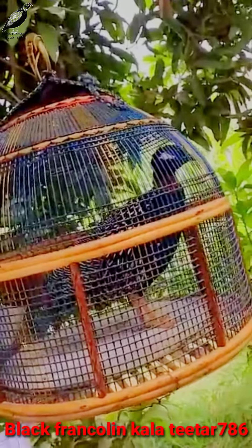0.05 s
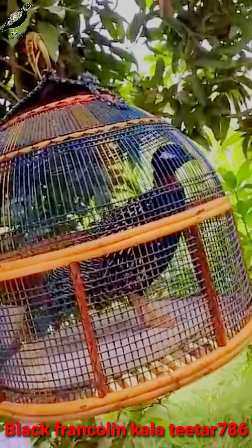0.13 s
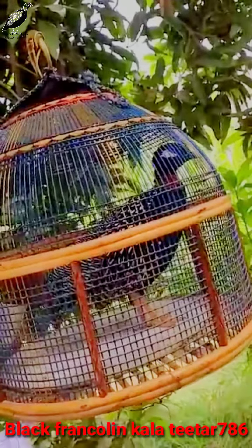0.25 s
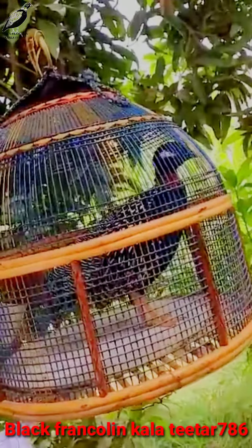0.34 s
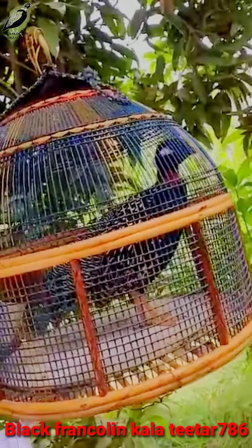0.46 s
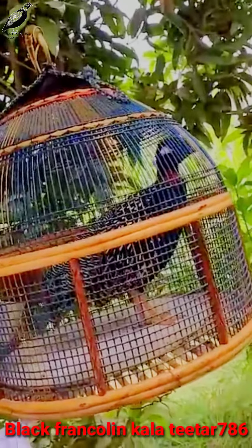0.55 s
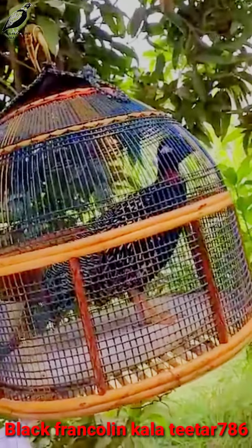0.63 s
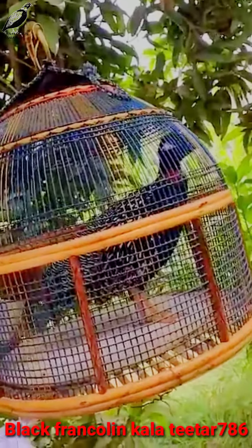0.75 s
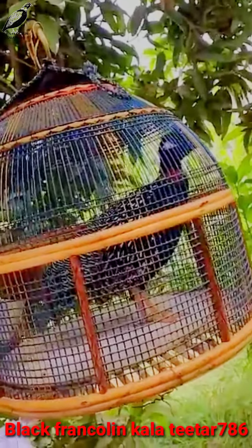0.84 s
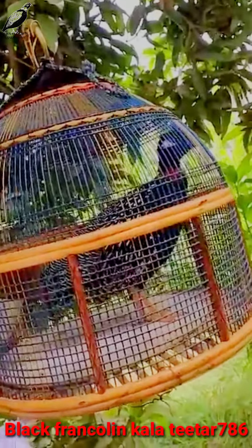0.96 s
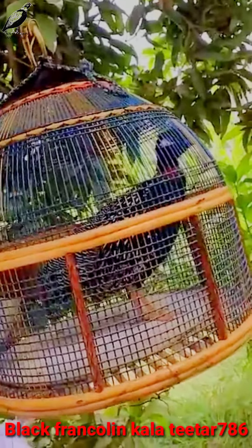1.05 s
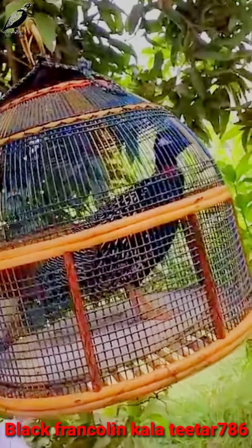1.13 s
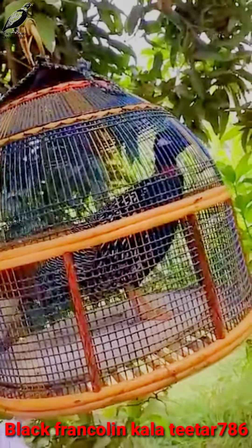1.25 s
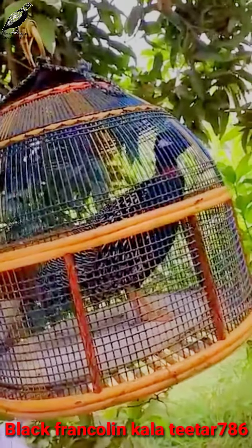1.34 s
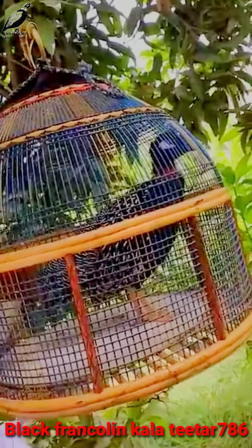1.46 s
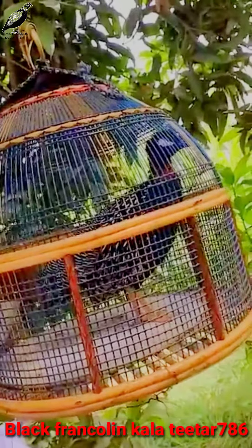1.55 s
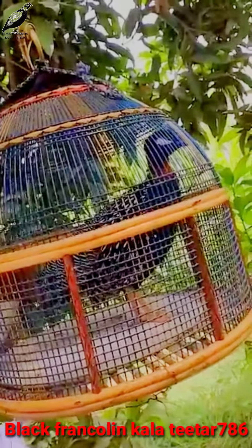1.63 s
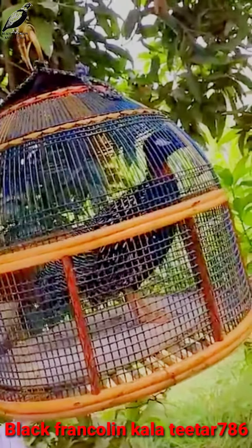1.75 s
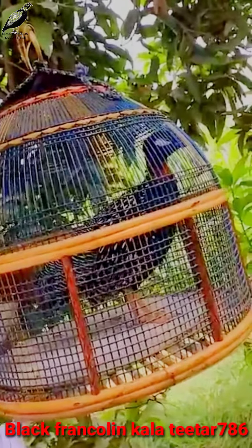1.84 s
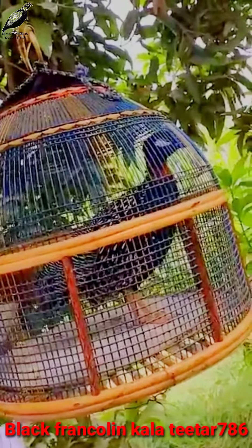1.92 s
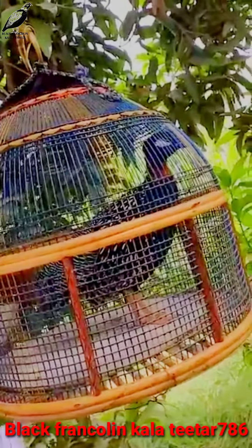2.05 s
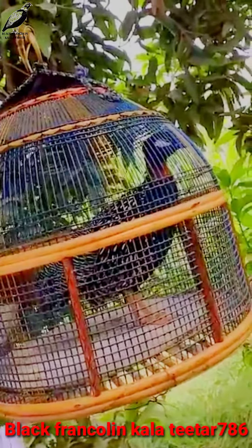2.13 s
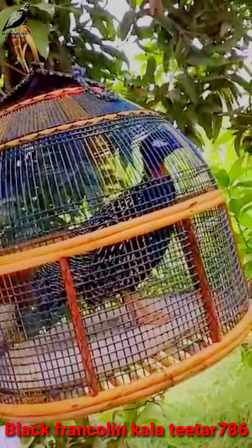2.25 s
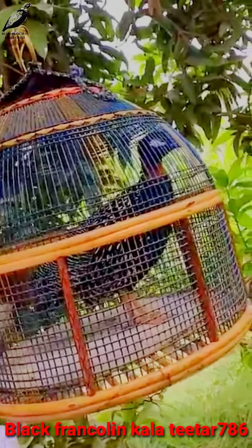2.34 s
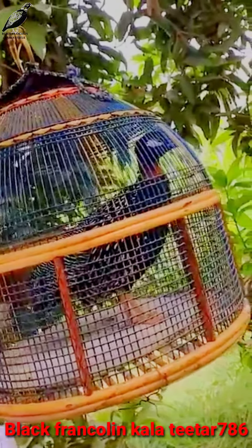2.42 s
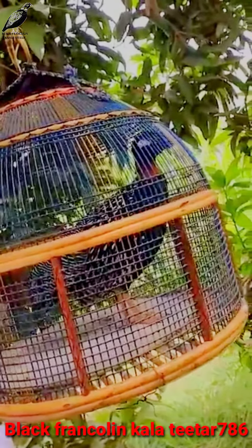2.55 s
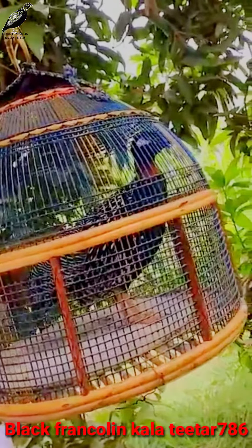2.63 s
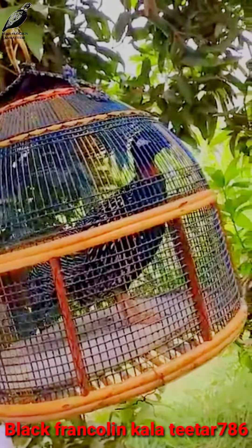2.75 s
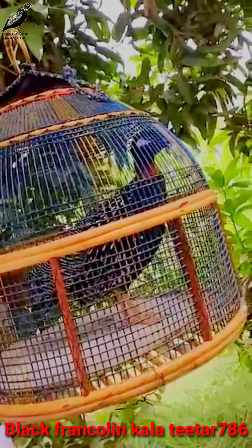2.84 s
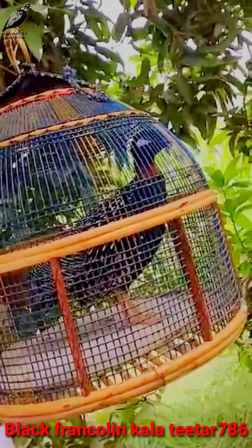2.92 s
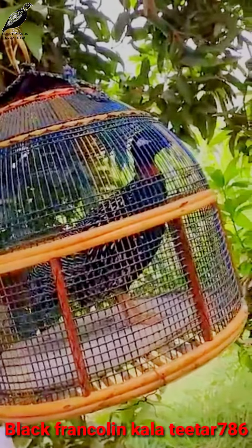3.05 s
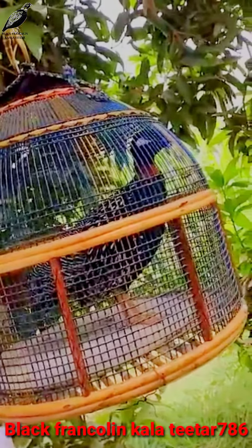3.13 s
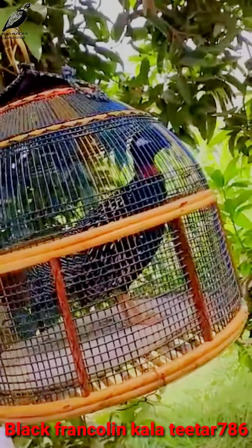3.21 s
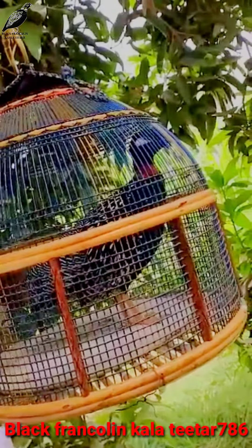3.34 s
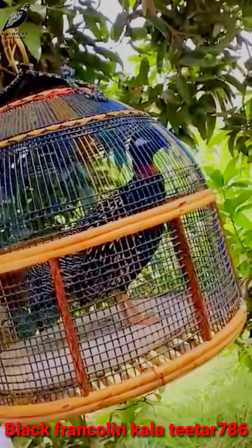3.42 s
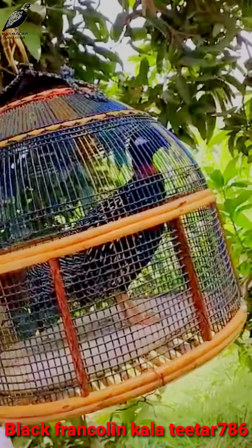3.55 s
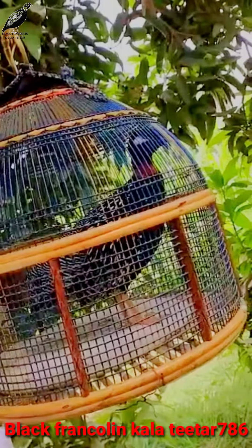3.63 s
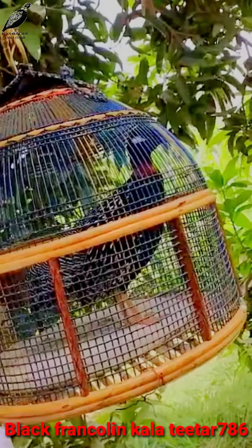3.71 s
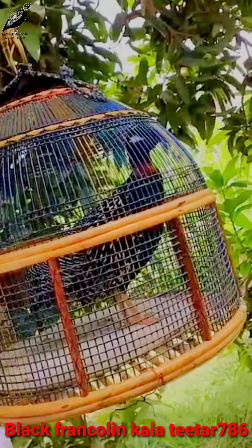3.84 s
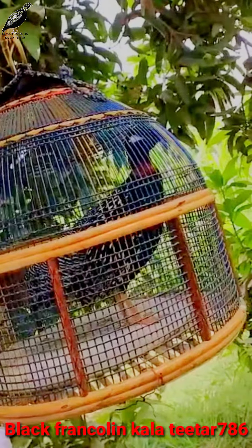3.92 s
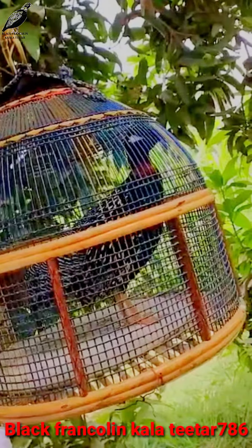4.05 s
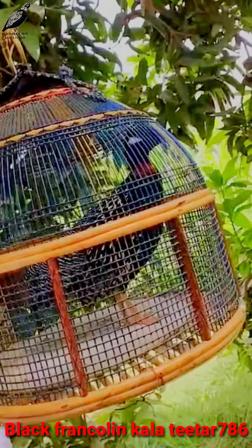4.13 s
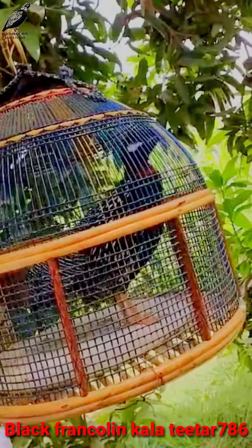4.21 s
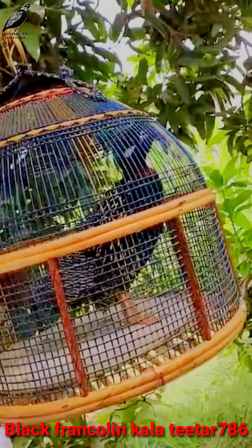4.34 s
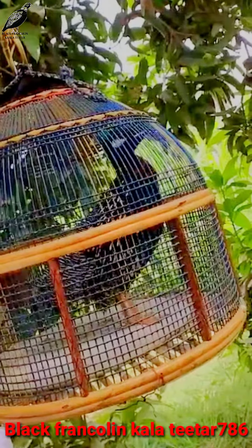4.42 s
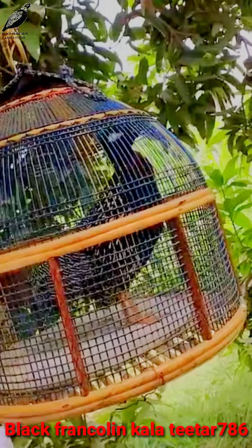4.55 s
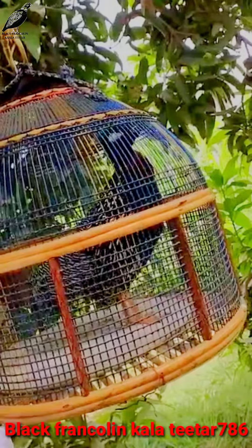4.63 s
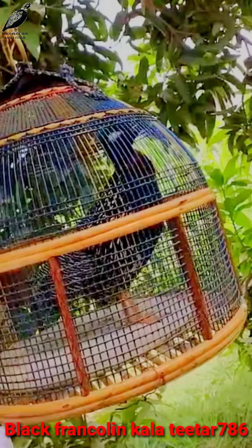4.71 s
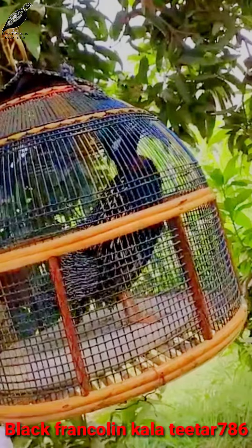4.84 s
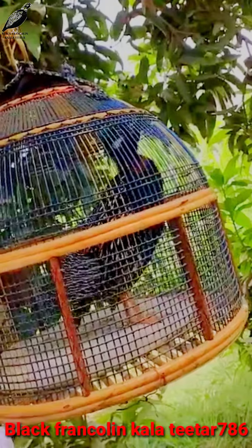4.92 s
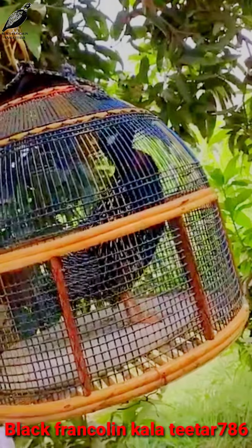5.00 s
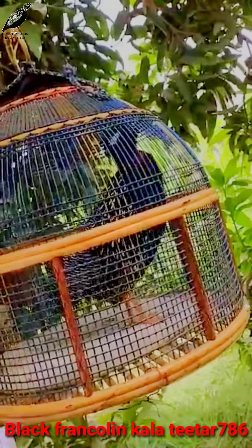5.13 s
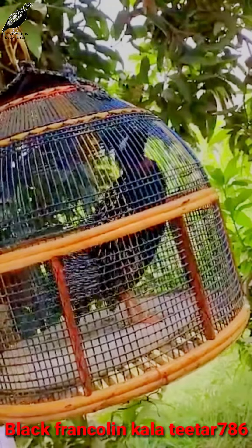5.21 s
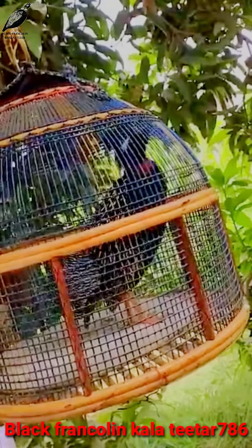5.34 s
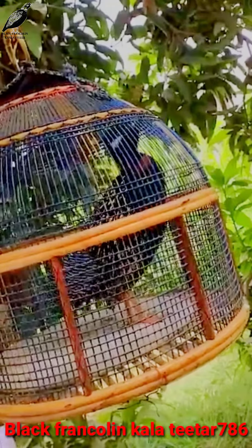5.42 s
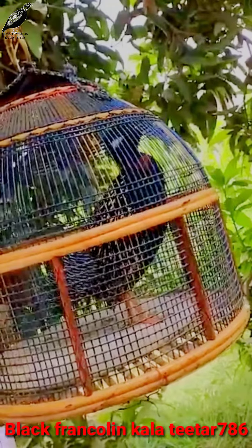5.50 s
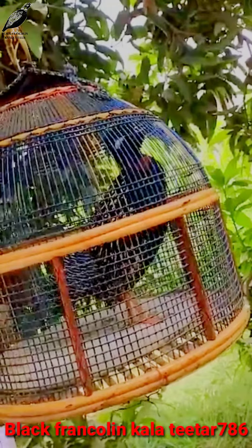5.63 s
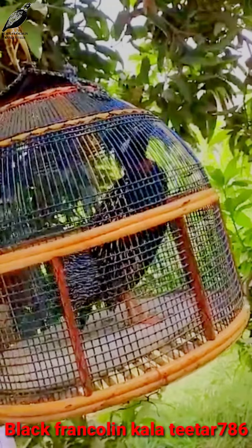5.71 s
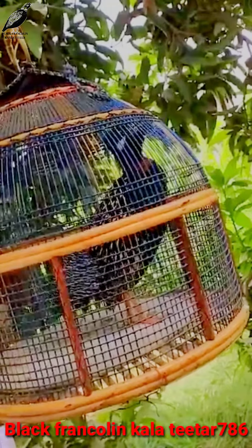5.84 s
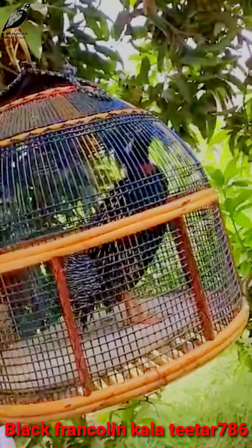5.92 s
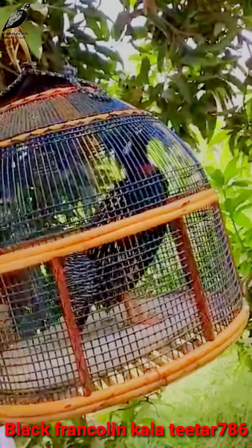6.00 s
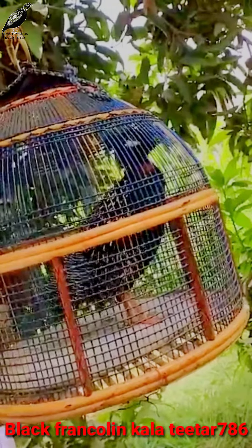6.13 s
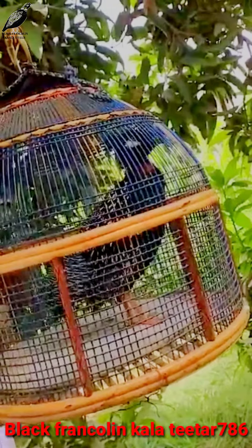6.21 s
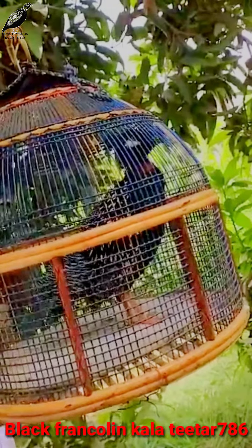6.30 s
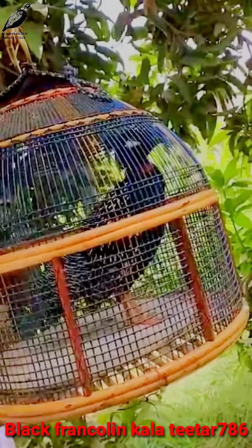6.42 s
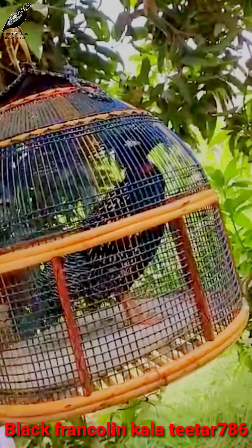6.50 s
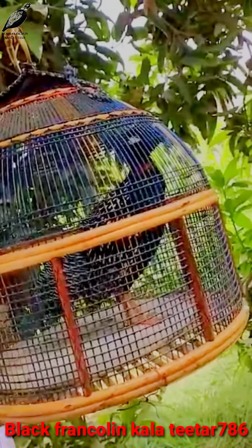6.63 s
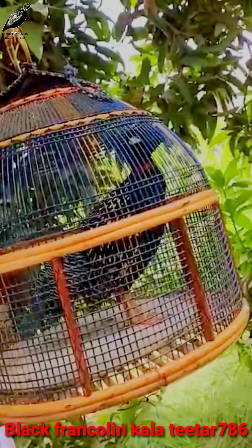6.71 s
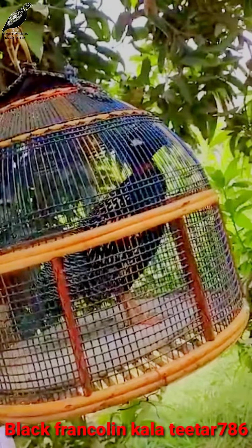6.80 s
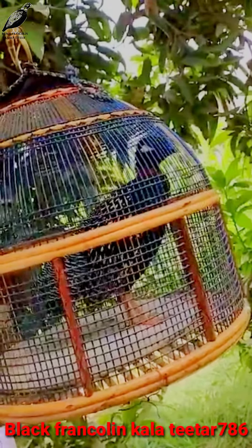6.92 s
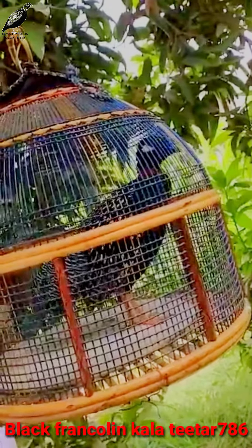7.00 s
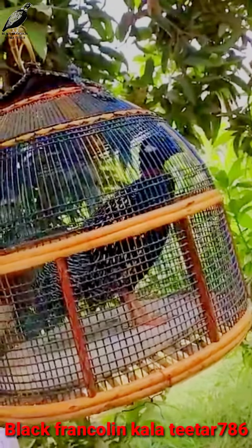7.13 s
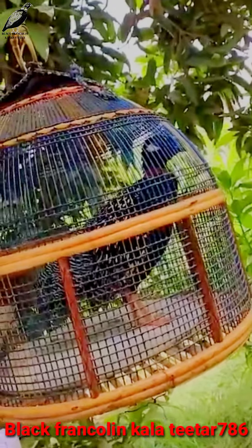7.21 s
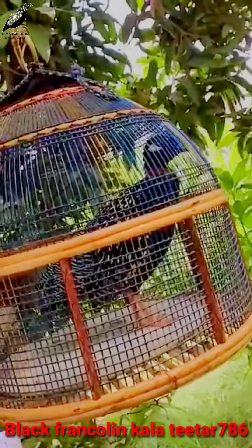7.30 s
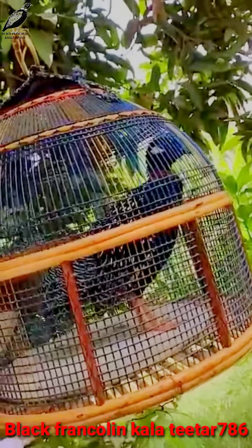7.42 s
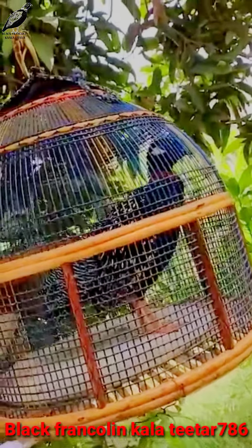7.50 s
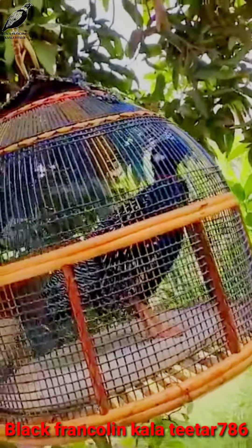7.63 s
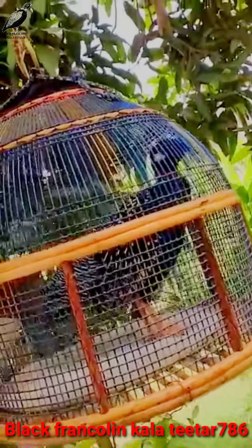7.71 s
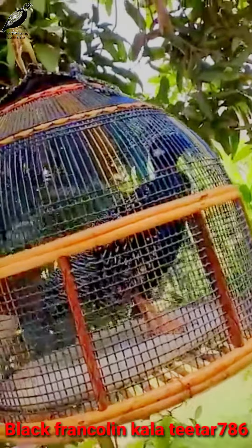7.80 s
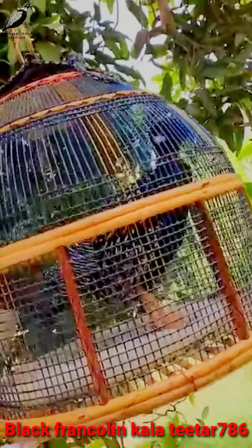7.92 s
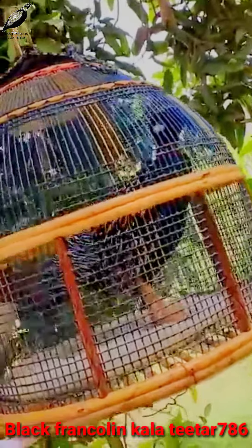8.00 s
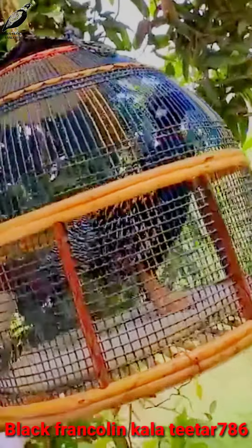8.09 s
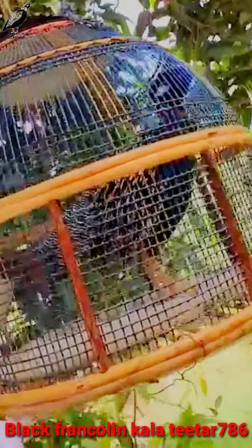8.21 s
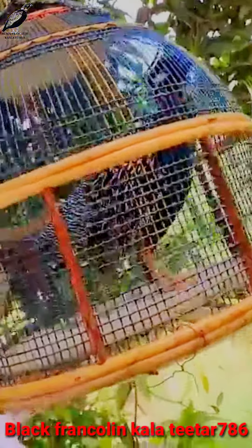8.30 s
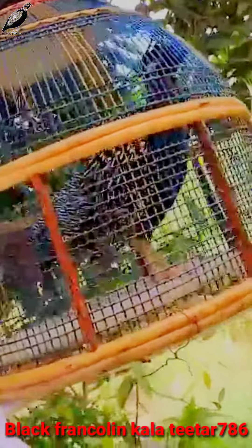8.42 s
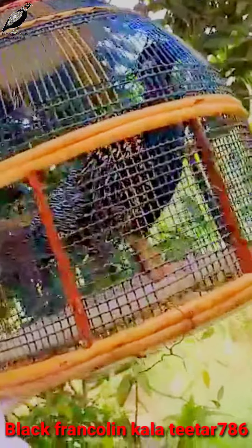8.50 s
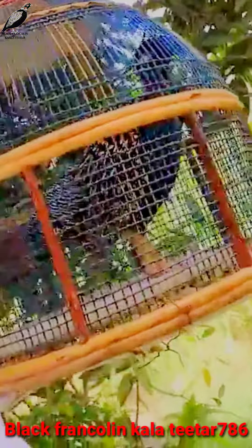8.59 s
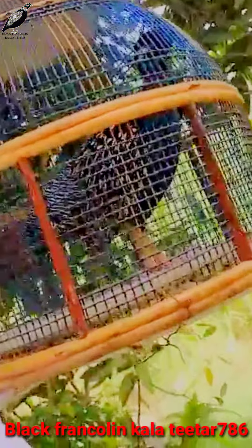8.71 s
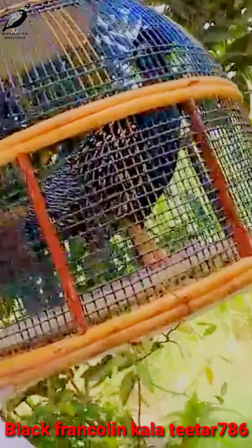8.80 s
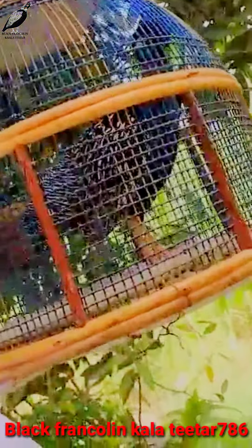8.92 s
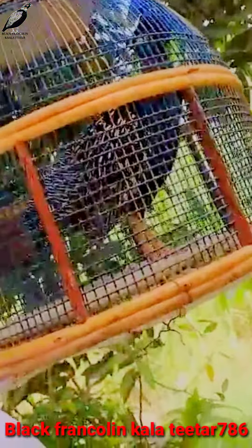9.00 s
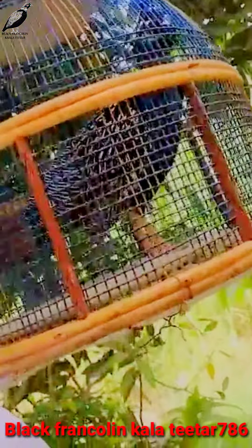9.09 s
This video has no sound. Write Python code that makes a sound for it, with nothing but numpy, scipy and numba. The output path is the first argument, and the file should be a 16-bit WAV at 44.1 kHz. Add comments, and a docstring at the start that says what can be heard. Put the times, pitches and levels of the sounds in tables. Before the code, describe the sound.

From 0 to 4.3 s it is quiet outdoors: soft leaf hiss, fluttering low traffic rumble, a distant engine hum, faint hoarse chirps and thin bird notes, slightly clearer around 2.2 s with a mellow falling whistle, and a high insect buzz at 2.7 s. At 4.35 s a close caged bird gives a tiny hard double cluck with a squeaky whistle break. Then comes its very loud, dry, grating call: a rasp at 4.86-5.01, a pair at 5.22-5.43, and three more from 5.72 to 6.07, centred near 2.8 kHz, sagging slightly, with rough pulsing, brief whistled breaks and low air blasts. Bright short echoes die quickly. From 6.3 s faint hoarse chirps return, and from 6.5 s a songbird repeats rising, flicked notes, growing more distant, alongside thin twitters. A soft dull cage tick lands at 7.67, another insect buzz at 8.8, and birds continue to about 9.1 s.

```python
"""Caged bird's raspy call

A partridge-like bird in a wire cage rasps one loud call a metre from a phone hung among trees.
Its voice organ (syrinx) throbs in uneven pulses that ring the throat, and at times it whistles purely.
Leaves and walls echo the call as dying noise. Behind it are gliding songbirds, hoarse chirps and
a buzzing insect, one dull tick of the cage, and noise-made leaves and traffic with an engine's hum."""
import sys
import numpy as np
from scipy import signal
from scipy.fft import rfft, irfft
from scipy.io import wavfile
from scipy.ndimage import uniform_filter1d, minimum_filter1d
from numba import njit

SR = 44100
rng = np.random.default_rng(int(sys.argv[2]) if len(sys.argv) > 2 else 0)


def inscribe(sig):
    """Save sig as 16-bit PCM at rate SR to the path in sys.argv[1].

    A 1-D sig is mono; a 2-D sig holds one channel per row.
    Samples are clipped to [-1, 1] before scaling.
    """
    pcm = np.round(np.clip(np.atleast_2d(sig).T, -1, 1) * 32767)
    wavfile.write(sys.argv[1], SR, pcm.astype(np.int16))


N = 403515
TIME = np.arange(N) / SR  # seconds

# Rasped syllables: start_s, end_s, attack_s, level_db, throat_hz (halfway through),
# blast_db (low air blast against level_db), upper_db (upper throat against the main throat tone)
SYLLABLES = [(4.858, 5.011, 0.0064, -6, 2794, 3, -8), (5.217, 5.364, 0.019, -5.5, 2775, 0.5, -9.5),
             (5.381, 5.432, 0.004, -6, 2765, -1.5, -7.5), (5.723, 5.83, 0.019, -5, 2830, -0.5, -7.5),
             (5.902, 5.969, 0.0098, -6.5, 2690, -1, -9), (5.985, 6.074, 0.0036, -6, 2775, -2, -9)]
ATTACK_FROM_DB, RELEASE_S, RELEASE_DB = -10.5, .008, -5.5
THROAT_SAG_HZ_PER_S = 320
WOBBLES_PER_S, LEVEL_WOBBLE_DB, THROAT_WOBBLE_HZ, UPPER_WOBBLE_DB = 70, 1, 90, 3.5
# The low blast swells and sinks: where its top is (share of the length), then dB at start and end
BLAST_TOP_AT, BLAST_START_DB, BLAST_END_DB = 0.47, -8.5, -7
RASP_ROUGH = 0.55  # share of noise puffs; the rest is pulses


def rasp():
    """Each syllable attacks, holds and releases while its throat tone sags and wavers."""
    out = np.zeros((2, N))  # voice and low blast
    for t0, t1, attack_s, db, throat_hz, blast_db, upper_db in SYLLABLES:
        part, t, gate = span(t0, t1, 0.0015)
        shape_db = np.interp(t, [t0, t0 + attack_s, t1 - RELEASE_S, t1], [ATTACK_FROM_DB, 0, 0, RELEASE_DB])
        swell_db = np.interp((t - t0) / (t1 - t0), [0, BLAST_TOP_AT, 1], [BLAST_START_DB, 0, BLAST_END_DB])
        sagging_hz = throat_hz - THROAT_SAG_HZ_PER_S * (t - (t0 + t1) / 2)
        level_wobble, throat_wobble, upper_wobble = (
            np.interp((t - t0) * WOBBLES_PER_S, np.arange(40), knots)
            for knots in rng.standard_normal((3, 40)))
        level_db = db + shape_db + LEVEL_WOBBLE_DB * level_wobble
        wavering_hz = sagging_hz + THROAT_WOBBLE_HZ * throat_wobble
        wavering_upper_db = upper_db + UPPER_WOBBLE_DB * upper_wobble
        out[:, part] += gate * throat(t, level_db, wavering_hz, blast_db + swell_db,
                                      wavering_upper_db, RASP_ROUGH)
    return out


# Rough air under the clucks and whistles: start_s, end_s, level_db, throat_hz,
# blast_db (against level_db), upper_db (against the main throat tone)
BREATHS = [(4.343, 4.39, -27, 3250, -15, 1), (4.394, 4.437, -32, 2753, 12.5, 11.5),
           (5.355, 5.383, -27.5, 2900, 13.5, -2), (5.964, 5.992, -27.5, 2980, 12.5, -11.5)]
BREATH_ROUGH = 0.99  # nearly all noise puffs


def breath():
    """Turbulent air rings the same throat, with almost no clean pulses."""
    out = np.zeros((2, N))
    for t0, t1, db, throat_hz, blast_db, upper_db in BREATHS:
        part, t, gate = span(t0, t1, 0.0015)
        out[:, part] += gate * throat(t, db, throat_hz, blast_db, upper_db, BREATH_ROUGH)
    return out


# Upper throat resonances: centre_hz, width_hz (of the first pass), level_db (relative)
UPPER_RESONANCES = [(4590, 730, 4.5), (5173, 950, -3), (7380, 730, -8.5), (7970, 170, -17)]
# Resonances of the low air blast: centre_hz, width_hz, level_db (relative)
BLAST_RESONANCES = [(126, 42, -8.5), (240, 190, 3.5), (670, 1300, 6), (1650, 480, -4.5)]
PULSES_PER_S = 265  # on average
# Ring widths are those of the first pass
THROAT_WIDTH_HZ = 800
CORE_HZ, CORE_WIDTH_HZ, CORE_DB = 3050, 260, -6  # narrow resonance inside the throat band
TOP_HISS_HZ, TOP_HISS_WIDTH_HZ, TOP_HISS_DB = 9900, 3600, -31.5
BEAK_TOP_HZ = 8600


def throat(t, db, throat_hz, blast_db, upper_db, rough):
    """Uneven syrinx pulses and puffs of noise ring the throat: the voice, and its low blast of air."""
    period_chance, size_chance = rng.standard_normal((2, 200))
    throat_noise, upper_noise, blast_noise = rng.standard_normal((3, len(t)))
    cycles = .75 + PULSES_PER_S * (t - t[0])  # the first pulse falls as the beak opens
    wobble = np.interp(cycles, np.arange(200), period_chance)
    cycles = cycles + .08 * np.minimum(cycles - .75, 1) * wobble  # uneven periods
    whole = np.floor(np.maximum(cycles, 0))
    size = undb(1.3 * size_chance)[np.clip(whole, 0, 199).astype(int)]
    pulses = level(size * (np.diff(whole, prepend=0) > 0), 0)
    puff = level(size * np.exp(-(cycles - whole)), 0)  # dies away within each cycle

    drive = (1 - rough) * pulses + rough * puff * throat_noise
    broad = level(ring(drive, throat_hz, THROAT_WIDTH_HZ), 0)
    core = level(ring(drive, CORE_HZ, CORE_WIDTH_HZ), CORE_DB)
    main = steep(level(broad + core, 0), BEAK_TOP_HZ, "low")

    upper_drive = 0.18 * pulses + puff * upper_noise
    upper = sum(undb(d) * level(ring(upper_drive, hz, width), 0) for hz, width, d in UPPER_RESONANCES)
    top_hiss = level(ring(puff * throat_noise, TOP_HISS_HZ, TOP_HISS_WIDTH_HZ), TOP_HISS_DB)
    upper = steep(level(upper, 0), BEAK_TOP_HZ, "low") + top_hiss

    blast_drive = 0.043 * pulses + puff * blast_noise
    low = sum(undb(d) * level(svf(blast_drive, hz + 0 * t, 1. * width), 0)
              for hz, width, d in BLAST_RESONANCES)
    voice = undb(db) * (main + undb(upper_db) * upper)
    blast = undb(db + blast_db) * steep(level(low, 0), 5000, "low")
    return np.array([voice, blast])


# Clucks that open and close the first note: start_s, length_s, start_hz, start_db
CLUCK_NOTES = [(4.3457, 0.0052, 2603, -0.5), (4.3509, 0.0034, 2800, 2), (4.3563, .004, 2500, -4),
               (4.362, .003, 3200, -4), (4.4288, 0.0038, 2750, -1)]
CLUCK_FADE_DB, CLUCK_RISE = 5.5, 1.08  # level lost and pitch ratio by the end of a cluck


def clucks():
    """Short hard bursts of one rough throat tone, each rising in pitch and fading."""
    notes = [[(s, hz, db), (s + length, CLUCK_RISE * hz, db - CLUCK_FADE_DB)]
             for s, length, hz, db in CLUCK_NOTES]
    return tones(notes, 0.00059, rough=0.36, spread_hz=880)


# Voiced end of the first cluck: time_s, pitch_hz, level_db
HONK_PATH = [(4.354, 847, -18.5), (4.362, 827, -14.5), (4.369, 875, -10.5), (4.377, 980, -24)]
# Its overtones: multiple (of the pitch), level_db (against HONK_PATH)
HONK_OVERTONES = [(2, -3), (3, -1.5), (4, -4.5), (5, -13.5), (6, -4), (7, -21.5), (8, -20), (9, -19.5)]


def honk():
    """A brief voiced sound: overtones of one moving pitch, without the pitch itself."""
    return tones([HONK_PATH], 0.0017, HONK_OVERTONES, rough=.35, spread_hz=220)


# Breaks into a whistle: start_s, end_s, start_hz, end_hz, level_db
WHISTLE_NOTES = [(4.396, 4.41, 4970, 5140, -14.5), (4.409, 4.436, 6045, 6223, -17),
                 (4.414, 4.428, 5610, 5433, -18.5), (5.362, 5.381, 5610, 5470, -11),
                 (5.965, 5.984, 5620, 5810, -11)]


def whistles():
    """The call breaks into gliding sine tones, slightly shaken."""
    return tones(glide(WHISTLE_NOTES), 0.00088, rough=0.4, spread_hz=630)


ECHO_LOW_HZ = 1760  # the echoes thin out below this
ECHO_TREBLE_HZ, ECHO_TREBLE_DB = 10560, 18
NEAR_ECHO_DB, NEAR_ECHO_T60_S, NEAR_ECHO_S = -11.5, 0.36, .095  # gone by NEAR_ECHO_S
FAR_ECHO_DB, FAR_ECHO_T60_S = -21, 0.38


def call_echo(call):
    """Leaves and walls scatter the call, near and far, with little bass and much treble."""
    thin = signal.sosfilt(signal.butter(3, ECHO_LOW_HZ, "high", fs=SR, output="sos"), call)
    # the echoes sound brighter than the call
    thin = thin + undb(ECHO_TREBLE_DB) * ring(call, ECHO_TREBLE_HZ, 7000)
    near = echo(thin, NEAR_ECHO_DB, NEAR_ECHO_T60_S, NEAR_ECHO_S)
    return near + echo(thin, FAR_ECHO_DB, FAR_ECHO_T60_S)


BLAST_LOW_HZ = 97
BLAST_TAIL_DB, BLAST_TAIL_T60_S = -23, 0.17


def near_blast(blast):
    """The low blast reaches the near microphone, with a weak tail of its own."""
    near = steep(blast, BLAST_LOW_HZ, "high")
    return near + echo(near, BLAST_TAIL_DB, BLAST_TAIL_T60_S)


TICK_S = 7.6685
# Ringing of the cage: pitch_hz, level_db (peak, before filtering), t60_s (time to fall 60 dB)
CAGE_MODES = [(151.4, -40, 0.049), (810, -46, 0.013), (1310, -42.5, 0.0094), (1837, -38, 0.0071)]


def tick():
    """One light, dull knock of the cage: fading sine tones, trimmed at both ends of the pitch range."""
    t = np.maximum(TIME - TICK_S, 0)
    rings = -sum(undb(db - 60 * t / t60) * np.sin(2 * np.pi * hz * t) for hz, db, t60 in CAGE_MODES)
    return steep(steep(rings, 2150, "low"), 69.7, "high")


TREE_ECHO_DB, TREE_ECHO_T60_S = -2, 0.16


def songbirds():
    """Small birds and an insect near and far, smeared by an echo from the trees."""
    dry = sweeps() + twitter() + mellow() + chirps() + insect()
    return dry + echo(dry, TREE_ECHO_DB, TREE_ECHO_T60_S)


# One songbird, moving further off: start_s, knee_s, start_hz, knee_hz, knee_db, top_db
SWEEP_NOTES = [(6.501, 6.554, 5740, 5670, -59.5, -62.5), (6.669, 6.734, 4720, 5150, -63, -64),
               (6.866, 6.921, 4570, 5330, -61.5, -62), (7.05, 7.134, 4330, 5200, -60.5, -61.5),
               (7.645, 7.697, 4704, 5050, -70.5, -71), (7.822, 7.863, 4800, 5000, -69, -70.5),
               (7.994, 8.05, 4705, 4920, -72, -80), (8.165, 8.215, 4680, 4940, -74, -82),
               (8.352, 8.395, 4700, 4960, -69, -73), (8.54, 8.587, 4750, 4880, -71.5, -73),
               (8.725, 8.815, 4000, 4980, -74, -79), (8.945, 9.047, 4020, 5090, -74, -78)]
# Flick after the knee: after_knee_s, pitch_hz, level_db (against top_db),
# distance_loss (dB lost per dB that the knee lies below NEAR_SONG_DB)
FLICK_PATH = [(.004, 5500, 1, 0), (.014, 6222, -2.5, .8), (.032, 6680, -1, -1), (.052, 6720, -12, 5)]
SWEEP_START_DB, NEAR_SONG_DB = -5.5, -62  # the start is against knee_db


def sweeps():
    """Each note slides to a knee, then flicks up to a held top; distance reshapes the flick."""
    notes = []
    for t0, knee, start_hz, knee_hz, db, top_db in SWEEP_NOTES:
        faintness_db = max(NEAR_SONG_DB - db, 0)
        slide = [(t0, start_hz, db + SWEEP_START_DB), (knee, knee_hz, db)]
        flick = [(knee + s, hz, top_db + d - loss * faintness_db) for s, hz, d, loss in FLICK_PATH]
        notes.append(slide + flick)
    return tones(notes, 0.0061, rough=0.57, spread_hz=200)


# Other thin notes: start_s, end_s, start_hz, end_hz, level_db
TWITTER_NOTES = [(.1, .3, 646, 740, -77), (.17, .26, 4600, 5300, -82), (.55, .75, 1730, 1800, -76),
                 (.83, .92, 4070, 5160, -78), (1.03, 1.09, 5060, 6200, -76), (1.29, 1.36, 4230, 4900, -78),
                 (1.5, 1.57, 4100, 4800, -80), (2.186, 2.204, 2420, 2550, -57.5),
                 (7.248, 7.278, 5330, 7880, -67), (7.31, 7.38, 3520, 5630, -68.5),
                 (7.45, 7.47, 6670, 7530, -66), (7.51, 7.585, 3470, 5370, -70.5),
                 (7.66, 7.695, 7020, 7650, -70), (7.72, 7.78, 3460, 4870, -72),
                 (7.997, 8.06, 3840, 3900, -73), (8.09, 8.135, 6440, 6350, -75),
                 (8.24, 8.27, 3750, 3830, -77), (8.445, 8.51, 3860, 3890, -77)]


def twitter():
    """Thin, shaken sine notes that glide in pitch."""
    return tones(glide(TWITTER_NOTES), 0.0076, rough=0.54, spread_hz=400)


# A mellow bird: start_s, end_s, start_hz, end_hz, level_db, octave_db (overtone against the note)
MELLOW_NOTES = [(2.191, 2.268, 1437, 1372, -64, -2), (2.296, 2.348, 1640, 1590, -62.5, -9)]


def mellow():
    """Smooth gliding notes, each with an overtone an octave up."""
    return sum(tones(glide([note[:5]]), 0.0066, [(1, 0), (2, note[5])], rough=.08, spread_hz=60)
               for note in MELLOW_NOTES)


# Hoarse chirps: start_s, length_s (before the extra fade), centre_hz, level_db (before the fades)
CHIRP_NOTES = [(0.208, .086, 5600, -69), (0.317, 0.12, 3600, -75), (.63, 0.11, 5650, -69.5),
               (1.06, 0.12, 5750, -74), (1.056, 0.041, 4200, -69), (1.669, .1, 5700, -67.5),
               (2.167, .11, 5700, -68.5), (2.205, 0.039, 3280, -66), (6.318, .067, 5930, -65.5),
               (6.411, 0.056, 6020, -67), (7.511, 0.064, 6140, -70), (8.09, 0.056, 5320, -73),
               (8.307, .075, 5900, -74), (8.65, .06, 7870, -78)]
CHIRP_WIDTH_HZ, CHIRP_THROBS_PER_S = 1960, 150  # width of each ring's first pass


def chirps():
    """Short puffs of throbbing noise in a band give a hoarse chirp."""
    return sum(buzz(s, length, hz, CHIRP_WIDTH_HZ, CHIRP_THROBS_PER_S, db)
               for s, length, hz, db in CHIRP_NOTES)


# Insect buzzes: start_s, level_db (before the fades)
INSECT_BUZZES = [(1.44, -82), (2.708, -64.5), (5.56, -63.5), (8.807, -65)]
INSECT_S, INSECT_HZ = 0.19, 7847  # length before the extra fade, centre
INSECT_WIDTH_HZ, INSECT_THROBS_PER_S = 1540, 200  # width of each ring's first pass


def insect():
    """An insect buzzes as fast-throbbing noise in a high band."""
    return sum(buzz(s, INSECT_S, INSECT_HZ, INSECT_WIDTH_HZ, INSECT_THROBS_PER_S, db)
               for s, db in INSECT_BUZZES)


BUZZ_RISE_S, BUZZ_FALL_S = .025, .045


def buzz(t0, length, hz, width_hz, rate, db):
    """A throbbing puff of narrow noise that swells and fades."""
    out = np.zeros(N)
    part, t, gate = span(t0, t0 + length + BUZZ_FALL_S / 2, BUZZ_RISE_S)
    gate = gate * np.clip((t[-1] - t) / BUZZ_FALL_S, 0, 1)
    throb = 1 + 0.41 * np.sin(2 * np.pi * rate * t)
    noise = throb * rng.standard_normal(len(t))
    out[part] = gate * level(ring(ring(noise, hz, width_hz), hz, width_hz), db)
    return out


# Colour of leaves and far town: pitch_hz, density_db (per Hz, relative)
HISS_COLOUR = [(180, -42), (300, -7), (400, -4.5), (600, -8), (1100, -10), (1700, -8.5), (2350, -8),
               (3000, -13), (4200, -22), (6500, -26), (7100, -25), (8700, -23), (9300, -32), (15500, -38)]
# Rumble bands: centre_hz, width_hz (of the first pass), level_db (against the hiss, before flutter)
RUMBLE_BANDS = [(111, 34, 0), (159, 40, -4), (225, 80, -3.5)]
# Course of hiss and rumble: time_s, level_db (of the hiss, before flutter)
AIR_LEVEL = [(0, -64), (1.5, -65.5), (2.6, -63), (3.4, -67), (4.3, -65.5), (6.5, -63.5), (9.15, -65)]


def air():
    """Leaves and far town are coloured hiss; traffic is fluttering bands of low noise."""
    f = np.maximum(np.fft.rfftfreq(N, 1 / SR), 1)
    colour_hz, colour_db = np.transpose(HISS_COLOUR)
    colour = undb(np.interp(np.log(f), np.log(colour_hz), colour_db))
    hiss = irfft(rfft(rng.standard_normal(N)) * colour, N)
    leaves = level(hiss, 0) * undb(1.6 * walk(6))
    rumble = 0
    for hz, width, db in RUMBLE_BANDS:
        band = level(ring(rng.standard_normal(N), hz, width), db)
        rumble = rumble + band * undb(2.3 * walk(27) + 1.3 * walk(2.0))
    return (leaves + rumble) * undb(np.interp(TIME, *np.transpose(AIR_LEVEL)))


HUM_HZ = 22.2  # mean firing rate of a far idling engine
# Its overtones: multiple (of the firing rate), level_db (relative, before wavering)
HUM_OVERTONES = [(4, -15), (5, -5.5), (6, 2.5), (8, -12.5), (9, -12.5)]
# Course of the hum: time_s, level_db
HUM_LEVEL = [(0, -61), (2, -63.5), (3, -62), (5.5, -60), (6.5, -68), (9.15, -66)]


def engine_hum():
    """A far engine hums in overtones of its firing rate, wavering in pitch and level."""
    turn = 2 * np.pi * np.cumsum(HUM_HZ * (1 + 0.037 * walk(2.8))) / SR
    hum = level(sum(undb(d + 2.4 * walk(9)) * np.sin(k * turn) for k, d in HUM_OVERTONES), 0)
    return hum * undb(np.interp(TIME, *np.transpose(HUM_LEVEL)))


ECHO_FADE_S = .025


def echo(x, db, t60, stop_s=1):
    """Scatter from leaves and walls: a dying burst of noise as the response."""
    t = TIME[:SR]
    fade = np.clip((stop_s - t) / ECHO_FADE_S, 0, 1)
    build_up = np.minimum(t / 0.0055, 1)
    burst = rng.standard_normal(SR) * undb(-60 * t / t60) * fade * build_up
    return signal.fftconvolve(x, undb(db) * burst / np.sqrt(np.sum(burst ** 2)))[:N]


def tones(notes, edge_s, orders=((1, 0),), rough=0., spread_hz=300):
    """Sine notes on rows (s, Hz, dB), with overtones; rough shakes size and phase of each.

    A level is the rms of an overtone at 0 dB, before roughness and edges."""
    out = np.zeros(N)
    for note in notes:
        s, hz, db = np.transpose(note)
        part, t, gate = span(s[0], s[-1], edge_s)
        turn = 2 * np.pi * np.cumsum(np.interp(t, s, hz)) / SR
        wave = 0
        for k, d in orders:
            knots = rng.standard_normal((3, 400))
            a, b = (np.interp((t - s[0]) * 2 * spread_hz, np.arange(400), c) for c in knots[:2])
            shake = 1 + rough * (a + 1j * b)
            start_phase = knots[2, 0] * np.pi
            wave = wave + undb(d) * np.imag(shake * np.exp(1j * (k * turn + start_phase)))
        out[part] += np.sqrt(2) * undb(np.interp(t, s, db)) * gate * wave
    return out


def glide(table):
    """Rows (start s, end s, start Hz, end Hz, dB) as two-point notes."""
    return [[(t0, f0, db), (t1, f1, db)] for t0, t1, f0, f1, db in table]


def span(t0, t1, edge_s):
    """Sample range of a sound, its times and a gate with short ramps."""
    part = slice(int(t0 * SR), int(t1 * SR))
    t = TIME[part]
    return part, t, np.clip(np.minimum(t - t0, t1 - t) / edge_s, 0, 1)


def ring(x, hz, width_hz):
    """A resonance applied twice, the second wider, so its skirts are steep."""
    hz = hz + np.zeros(len(x))
    return svf(svf(x, hz, 1. * width_hz), hz, 1.7 * width_hz)


@njit
def svf(x, hz, width):
    """State-variable band-pass with a moving centre, gain 1 there."""
    y, band, low = np.empty(len(x)), 0., 0.
    for i in range(len(x)):
        g, k = np.tan(np.pi * hz[i] / SR), width / hz[i]
        v = (band + g * (x[i] - low)) / (1 + g * (g + k))
        band, low, y[i] = 2 * v - band, low + 2 * g * v, k * v
    return y


def steep(x, hz, kind):
    """Sixth-order low- or high-pass."""
    return signal.sosfilt(signal.butter(6, hz, kind, fs=SR, output="sos"), x)


def walk(rate):
    """Random levels held 1 / rate s and smoothed twice."""
    k = int(SR / rate)
    steps = np.repeat(rng.standard_normal(N // k + 1), k)
    return uniform_filter1d(uniform_filter1d(steps, k), k)[:N]


def level(x, db):
    """Scale a sound to an rms level in dB."""
    return x * undb(db) / np.sqrt(np.mean(x ** 2))


def undb(db):
    """Decibels to an amplitude factor."""
    return 10 ** (np.asarray(db) / 20)


def scene():
    """The call and its echoes, then cage, songbirds and far background, on one channel."""
    voice, blast = rasp() + breath()
    call = voice + clucks() + honk() + whistles()
    bird = call + near_blast(blast) + call_echo(call)
    return (bird + tick() + songbirds() + air() + engine_hum())[None]


# Brief dips in level: centre_s, length_s, depth_db
LEVEL_DIPS = [(1.628, 0.022, 20), (1.976, 0.0087, 16), (3.201, 0.0073, 12), (3.308, 0.01, 19),
              (3.348, 0.013, 26), (3.706, 0.013, 12), (3.985, 0.01, 15), (4.313, 0.027, 14),
              (6.828, 0.011, 8)]
STEADY_HISS_DB, STEADY_HISS_HZ = -79, 8000  # hiss above this pitch
TREBLE_STEP_HZ, TREBLE_STEP_DB = 12850, 14  # duller above this pitch
GAIN_TOP_DB, GAIN_RATIO, GAIN_S = -23, 1.3, 0.016  # gain control: threshold, ratio, time constant
CEILING, LIMIT_S = .965, .0015  # clipping amplitude, limiter look-ahead
TOP_HZ = 15650  # nearly nothing is left above


def record(dry):
    """A steady hiss, a duller top above 12850 Hz, and brief dips in level.

    Gain control leans on the call, a quick limiter ducks ahead of the loudest pulses and tips clip."""
    hiss = level(steep(rng.standard_normal(N), STEADY_HISS_HZ, "high"), STEADY_HISS_DB)
    treble_step = signal.ellip(5, .1, TREBLE_STEP_DB, TREBLE_STEP_HZ, fs=SR, output="sos")
    heard = signal.sosfilt(treble_step, dry + hiss)
    for s, length, depth_db in LEVEL_DIPS:
        heard = heard * undb(-depth_db * np.clip(1.5 - 3 * np.abs(TIME - s) / length, 0, 1))

    slow = np.exp(-1 / (GAIN_S * SR))
    loud = np.sqrt(signal.lfilter([1 - slow], [1, -slow], heard ** 2))
    heard = heard * np.maximum(loud / undb(GAIN_TOP_DB), 1) ** (1 / GAIN_RATIO - 1)

    k = int(LIMIT_S * SR)
    room = np.minimum(1.125 / np.maximum(np.abs(heard), 1e-9), 1)  # limits above the clipping point
    gain = uniform_filter1d(minimum_filter1d(room, 2 * k + 1), k)
    held = np.clip(heard * gain, -CEILING, CEILING)
    return signal.sosfilt(signal.ellip(10, .1, 70, TOP_HZ, fs=SR, output="sos"), held)


dry = scene()
out = record(dry)
inscribe(out)
```